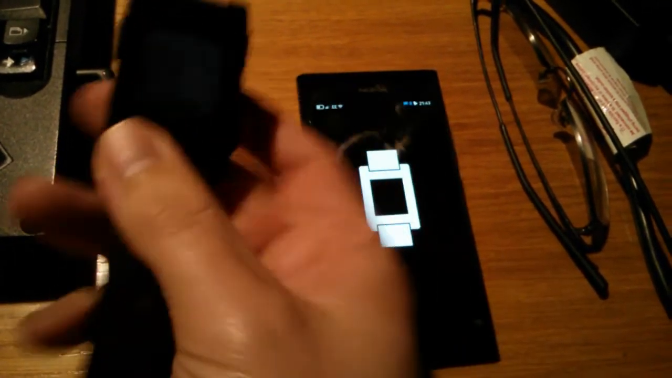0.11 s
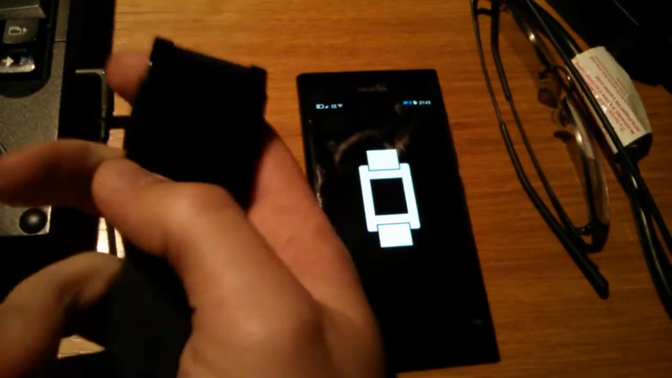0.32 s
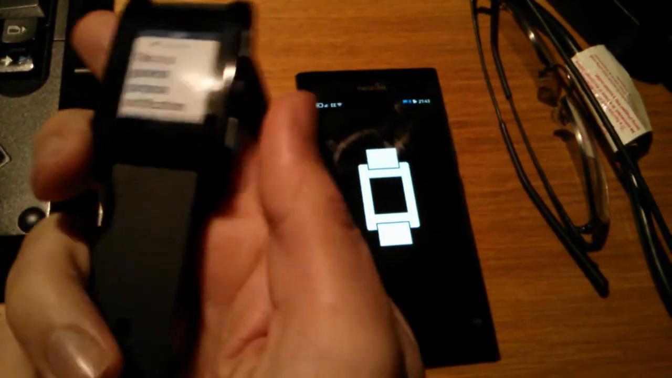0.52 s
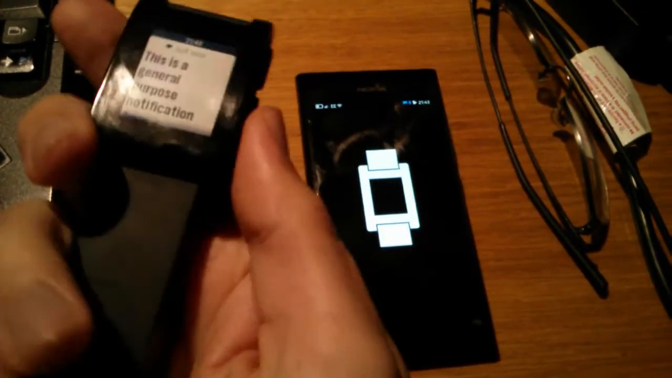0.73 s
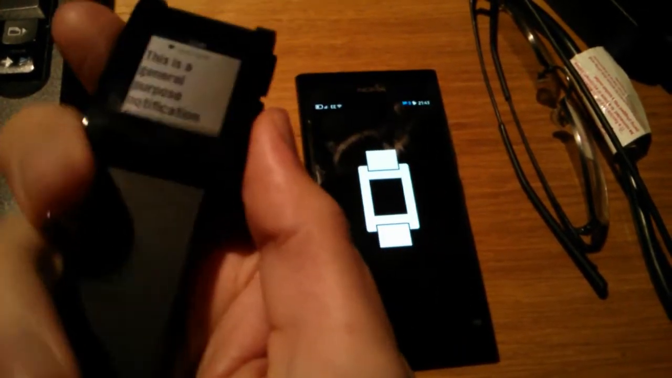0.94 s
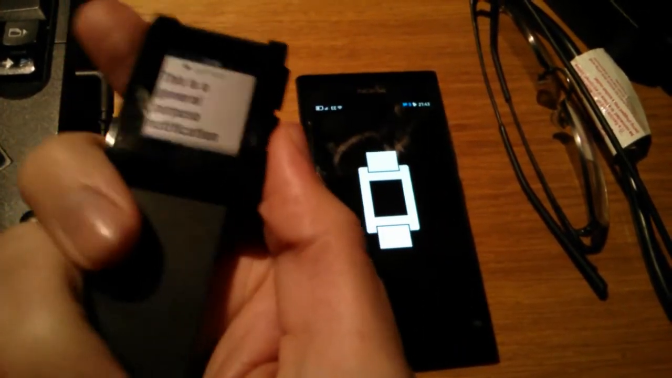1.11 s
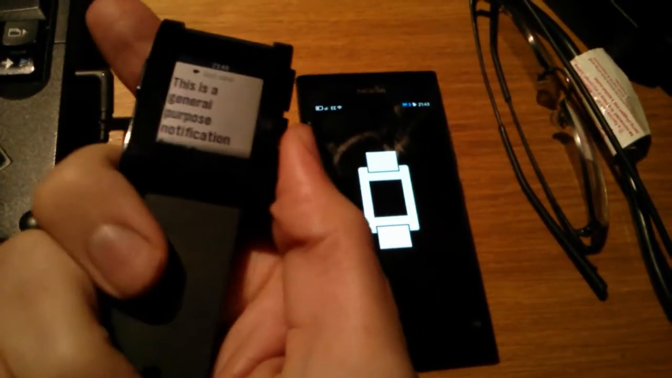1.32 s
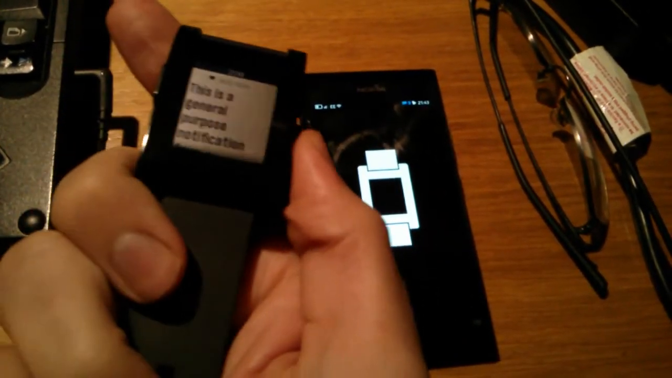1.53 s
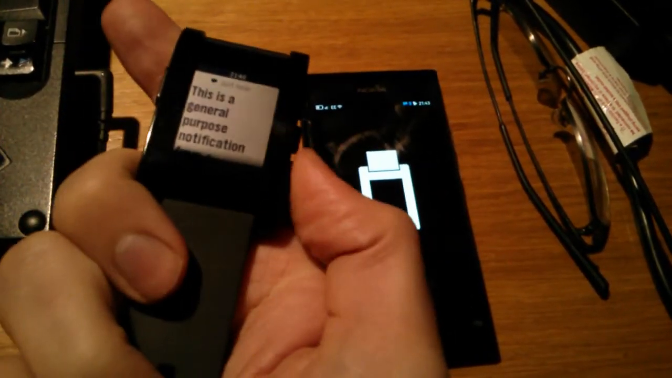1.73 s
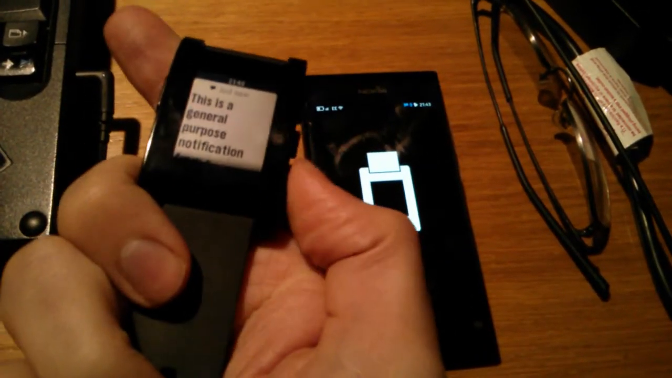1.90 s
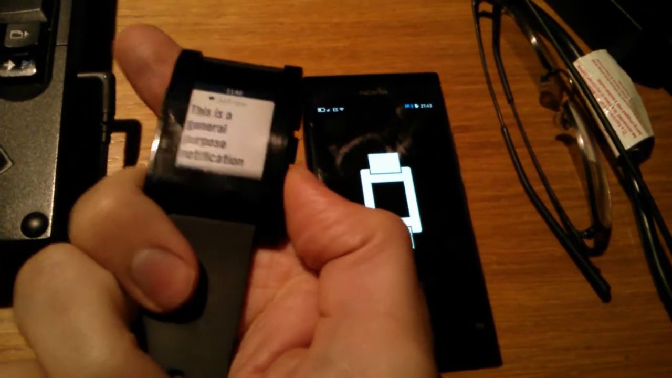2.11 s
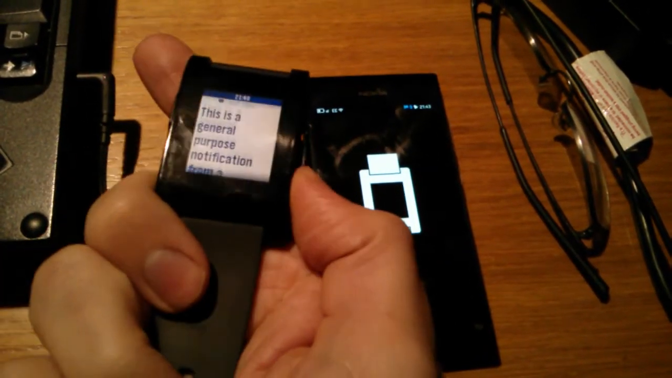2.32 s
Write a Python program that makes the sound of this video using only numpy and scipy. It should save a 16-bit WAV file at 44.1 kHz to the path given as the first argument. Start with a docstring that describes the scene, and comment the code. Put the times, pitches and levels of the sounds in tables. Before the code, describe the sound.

Close double click of a small watch button in a quiet room, with faint handling and hiss.

```python
"""The side button of a hand-held smartwatch, close to the microphone: a soft finger tap, then two sharp clicks,
one as it is pressed and one as it is let go. Each click is a filtered pulse with case modes and noise bursts,
answered by a small room. Skin scuffs are short noise bursts over dull ringing. A low bump of the grip (low sine)
comes before the tap; more bumps and faint ticks (noise) follow the clicks. Behind lie shaped-noise rumble and
microphone hiss, a wavering hum and a thin whine."""
import sys
import numpy as np
from scipy import signal
from scipy.fft import rfft, irfft
from scipy.io import wavfile

SR = 44100
rng = np.random.default_rng(int(sys.argv[2]) if len(sys.argv) > 2 else 0)


def inscribe(sig):
    """Save sig as 16-bit PCM at rate SR to the path in sys.argv[1].

    A 1-D sig is mono; a 2-D sig holds one channel per row.
    Samples are clipped to [-1, 1] before scaling.
    """
    pcm = np.round(np.clip(np.atleast_2d(sig).T, -1, 1) * 32767)
    wavfile.write(sys.argv[1], SR, pcm.astype(np.int16))


N = 105840  # 2.4 s

# Button snapping down, then up:
# (time [s], crack level [dB], ring level [dB], rattle and room level [dB], top of the crack [Hz])
BUTTON_CLICKS = [(0.2121, -0.5, 1, 0.5, 11370), (0.2652, -5, 0.5, -5, 10050)]
# Colour of the crack: (frequency [Hz], level [dB])
CRACK_COLOUR = [(100, -22.5), (250, -16), (380, -10.5), (560, -11.5), (950, -3.5), (1900, 1.5), (3100, -19),
                (4200, -20), (5000, 5.5), (6500, 4), (9000, 4), (11000, -6), (13000, -17), (16000, -19.5)]
# Resonances of the case, before the click's ring level:
# (frequency [Hz], peak level [dB], t60 [s], build-up [s])
CASE_MODES = [(378, -42, .05, .001), (452, -43.5, .045, .001), (670.6, -45.5, 0.058, 0.00073),
              (790, -46, 0.032, .001), (927, -40, 0.054, 0.00082), (1152, -45.5, .04, 0.0027),
              (1394, -36.5, 0.066, 0.0011), (1537, -43, 0.024, 0.00065), (1731, -36, 0.021, .001),
              (1903, -34, 0.033, .001), (2184, -41, 0.056, 0.0025), (2343, -42, .04, .004),
              (2620, -39.5, 0.013, .01), (2970, -32.5, 0.016, .014), (3306, -36.5, .02, 0.0053),
              (3655, -40.5, 0.023, .01), (4022, -41.5, 0.037, .006), (4500, -38.5, 0.054, .003),
              (4700, -36.5, .027, .002), (5238, -44, .035, .002), (5510, -43, 0.042, .002)]
# Dense ringing of small parts: (frequency [Hz], level [dB])
RATTLE_COLOUR = [(200, -23.5), (560, -21), (1100, -15.5), (1800, -5), (3200, -11), (4800, 4.5), (6500, 1.5),
                 (9000, -4), (10500, -14), (12500, -28), (16000, -30)]
# Thin top of each snap: (frequency [Hz], level [dB])
SPARK_COLOUR = [(8000, -45), (11700, -32), (12900, -18), (16000, -27.5)]
# Colour of the room's answer: (frequency [Hz], level [dB])
ROOM_COLOUR = [(150, -27), (400, -14.5), (560, -19), (900, -14.5), (1350, -6.5), (1900, -4.5),
               (2900, -10.5), (5000, -4.5), (8500, -12), (11000, -23.5), (16000, -30.5)]
# Decay of the room: (frequency [Hz], t60 [s])
ROOM_DECAY = [(250, 0.16), (1200, 0.15), (1950, .24), (2600, .16), (5000, .145), (12000, .17)]
# Fingertip meeting and pushing the button: (time [s], length [s], level [dB])
FINGER_TOUCHES = [(0.1177, 0.011, 2), (0.2024, 0.01, -5.5)]
# Colour of the skin scuff: (frequency [Hz], level [dB])
SCUFF_COLOUR = [(150, -34), (400, -30), (850, -17), (1100, -22.5), (1350, -21), (1850, -17), (2400, -26),
                (3000, -37), (4000, -36.5), (8000, -30.5), (15000, -38)]
# Colour of the tail after a touch: (frequency [Hz], level [dB])
TOUCH_TAIL_COLOUR = [(200, -33), (800, -22), (2000, -21.5), (3500, -39), (12000, -45)]
# Resonances under a soft touch, before the touch's level: (frequency [Hz], peak level [dB], t60 [s])
DULL_MODES = [(367, -62, .06), (570, -62, .05), (830, -51, 0.039), (1334.3, -59, .05), (1790, -52, .035),
              (1950, -55, .045), (2680, -64.5, .03), (3350, -62, .03), (5480, -67, 0.028)]
# Faint ticks and scuffs of the grip: (time [s], rise [s], t60 [s], level [dB])
GRIP_TICKS = [(0.664, 0.0085, 0.054, -9), (1.215, 0.026, .25, -9), (2.1944, 0.0006, 0.015, -11)]
# Colour of a tick: (frequency [Hz], level [dB])
TICK_COLOUR = [(500, -48), (4000, -56), (6700, -32), (8300, -34), (10500, -39), (15000, -51)]
# Soft low bumps of handling: (time [s], length [s], frequency [Hz], level [dB])
GRIP_BUMPS = [(0.031, 0.084, 96.2, -63.5), (0.909, 0.085, 57, -59), (1.205, 0.022, 83, -57.5),
              (1.233, 0.1, 78.4, -63.5), (1.955, 0.063, 43.8, -58.5)]
# Colour of the low rumble: (frequency [Hz], relative density [dB per Hz])
RUMBLE_COLOUR = [(12, -38), (20, -8), (65, 0), (113, -2), (145, -3.5), (171, -4), (204, -6), (242, -17.5),
                 (320, -24), (420, -49.5), (700, -120)]
# Rumble over time: (time [s], level [dB])
RUMBLE_COURSE = [(0, -69.5), (.07, -65.5), (.17, -67.5), (.5, -68.5), (.6, -73), (.78, -69.5), (.95, -68.5),
                 (1.1, -71), (1.23, -68), (1.4, -70), (1.55, -65), (1.68, -72), (1.9, -68), (2.05, -72.5),
                 (2.14, -63.5), (2.36, -65.5)]
# Hum over time: (time [s], level [dB])
HUM_COURSE = [(0, -68.5), (.3, -76), (.8, -73.5), (1.0, -77.5), (1.5, -68.5), (1.7, -78.5), (2.03, -73.5),
              (2.13, -66), (2.4, -65.5)]
# Colour of the microphone hiss: (frequency [Hz], relative density [dB per Hz])
HISS_COLOUR = [(180, -29.5), (300, -1), (370, -8), (401, -6.5), (775, -8.5), (940, -7), (1400, -14),
               (2310, -17), (2510, -23), (14000, -11)]
# Gain shared by hiss and whine: (time [s], level [dB])
HISS_COURSE = [(0, 9), (.1, 3.5), (.2, 8), (.33, 10.5), (.45, 5), (.6, 1), (1.6, 0.5), (1.85, 0), (2.1, 0),
               (2.4, 0)]
# Colour of the top of the hiss: (frequency [Hz], relative density [dB])
FIZZ_COLOUR = [(8000, -26), (12000, -7.5), (13500, -1), (14600, 0.5), (16000, -2)]
# Top of the hiss over time: (time [s], level [dB])
FIZZ_COURSE = [(0, -79.5), (.3, -78.5), (.6, -82), (1.0, -83), (1.6, -81.5), (1.85, -78.5), (2.1, -87),
               (2.4, -95)]

CRACK_FALL_S, CRACK_LOW_HZ = 0.00012, 5200  # the crack's lower treble arrives a little later
RATTLE_T60_S, RATTLE_RISE_S, SPARK_T60_S = 0.035, 0.0012, 0.014
ROOM_RISE_S, RING_ROOM_DB = 0.008, -24
TOUCH_T60_S, TOUCH_RISE_S = 0.09, 0.003
HUM_HZ, HUM_WAVER_HZ = 143, 3  # the waver is the rms deviation
HISS_BASE_DB = -75  # before the shared gain
WHINE_HZ, WHINE_BASE_DB = 15000, -81.5  # level before the shared gain
EDGE_HZ = 15850


def amp(db):
    """Decibels to gain."""
    return 10 ** (np.asarray(db) / 20)


def unit(x):
    """Scales to rms 1."""
    return x / np.sqrt(np.mean(x ** 2) + 1e-20)


def read(points, hz):
    """Reads a table on a log-frequency axis."""
    frequency, value = np.transpose(points)
    return np.interp(np.log(hz + 1), np.log(frequency + 1), value)


def level(points):
    """Gain over time from (time [s], level [dB]) points."""
    return amp(np.interp(np.arange(N) / SR, *np.transpose(points)))


def add(mix, s, sound):
    """Mixes a sound in at a time, cut at the end of the mix."""
    part = mix[round(s * SR):][:len(sound)]
    part += sound[:len(part)]


def dying(t, t60):
    """Exponential decay by 60 dB in t60."""
    return 1000. ** (-t / t60)


def rising(t, rise):
    """Smooth build-up from silence towards 1."""
    return 1 - np.exp(-(t / rise) ** 2)


def pulse(points, size=2048):
    """Minimum-phase pulse: the sharpest causal one with this spectrum."""
    hz = abs(np.fft.fftfreq(size, 1 / SR))
    log_gain = np.log(amp(read(points, hz)))
    spectrum = np.exp(np.conj(signal.hilbert(log_gain)))
    return np.fft.ifft(spectrum).real[:size // 2]


def burst(envelope, points):
    """Dense random impulses under an envelope, energy 1, then coloured."""
    taps = envelope * rng.choice([-1., 1.], len(envelope))
    taps = taps / np.linalg.norm(taps)
    return signal.fftconvolve(taps, pulse(points))[:len(taps)]


def noise(points):
    """Steady noise of rms 1 with this spectrum."""
    gain = amp(read(points, np.fft.rfftfreq(N, 1 / SR)))
    return unit(irfft(rfft(rng.standard_normal(N)) * gain, N))


def mode(t, hz, db, t60, rise):
    """One resonance that builds up to its peak and dies, at a random phase."""
    envelope = dying(t, t60) * rising(t, rise)
    return amp(db) * envelope / envelope.max() * np.sin(2 * np.pi * (hz * t + rng.random()))


def snap_crack():
    """A sharp pulse through an allpass, which delays the treble around one frequency."""
    radius = np.exp(-1 / (CRACK_FALL_S * SR))
    allpass = [1, -2 * radius * np.cos(2 * np.pi * CRACK_LOW_HZ / SR), radius ** 2]
    return signal.lfilter(allpass[::-1], allpass, pulse(CRACK_COLOUR))


def button():
    """The switch snaps: a crack, the modes of the case, a short rattle, a thin spark and the room."""
    out, t = np.zeros(N), np.arange(SR // 2) / SR
    ring = sum(mode(t, *row) for row in CASE_MODES)
    rattle = burst(dying(t, RATTLE_T60_S) * rising(t, RATTLE_RISE_S), RATTLE_COLOUR)
    crack = snap_crack()
    for s, crack_db, ring_db, rattle_db, top_hz in BUTTON_CLICKS:
        soften = signal.butter(4, top_hz, fs=SR)
        walls = room()
        answer = signal.fftconvolve(walls, pulse(ROOM_COLOUR))[:len(t)]
        ring_in_room = amp(RING_ROOM_DB) * signal.fftconvolve(walls, ring)[:len(t)]
        add(out, s, amp(crack_db) * signal.lfilter(*soften, crack))
        add(out, s, amp(rattle_db) * (rattle + answer))
        add(out, s, amp(ring_db) * (ring + ring_in_room))
        add(out, s, burst(dying(t, SPARK_T60_S), SPARK_COLOUR))
    return out


def room(size=256):
    """The small room's answer to an impulse: noise whose bands each die at their own speed."""
    hz, t, bands = signal.stft(rng.standard_normal(SR // 2), SR, nperseg=size)
    bands = bands * dying(t, read(ROOM_DECAY, hz)[:, None])
    tail = signal.istft(bands, SR, nperseg=size)[1][:SR // 2]
    tail = tail * rising(np.arange(len(tail)) / SR, ROOM_RISE_S)
    return tail / np.linalg.norm(tail)


def finger():
    """Skin scuffs the button for a few milliseconds; the watch rings dully and leaves a short tail."""
    out, t = np.zeros(N), np.arange(SR // 4) / SR
    for s, length, db in FINGER_TOUCHES:
        progress = np.minimum(t / length, 1)
        scuff = burst(np.sin(np.pi * progress), SCUFF_COLOUR)
        ring = sum(mode(t, *row, TOUCH_RISE_S) for row in DULL_MODES)
        tail = burst(progress ** 2 * dying(t, TOUCH_T60_S), TOUCH_TAIL_COLOUR)
        add(out, s, amp(db) * (scuff + ring + tail))
    return out


def grip():
    """The hands shift: ticks and scuffs are noise bursts, soft bumps are low sines under an arch."""
    out, t = np.zeros(N), np.arange(SR // 4) / SR
    for s, rise, t60, db in GRIP_TICKS:
        add(out, s, amp(db) * burst(dying(t, t60) * rising(t, rise), TICK_COLOUR))
    for s, length, hz, db in GRIP_BUMPS:
        arch = np.sin(np.pi * np.minimum(t / length, 1))
        add(out, s, amp(db) * arch * np.sin(2 * np.pi * hz * t))
    return out


def hum():
    """The room's low hum: a sine whose pitch wavers slowly at random."""
    slow = signal.butter(2, 8, fs=SR, output="sos")
    waver = unit(signal.sosfilt(slow, rng.standard_normal(N)))
    tone = np.sin(2 * np.pi * np.cumsum(HUM_HZ + HUM_WAVER_HZ * waver) / SR)
    return level(HUM_COURSE) * unit(tone)


def rumble():
    """Low noise of the room, swelling and sinking."""
    return level(RUMBLE_COURSE) * noise(RUMBLE_COLOUR)


def hiss_and_whine():
    """Microphone hiss and a thin electronic sine share one gain; the top of the hiss has its own."""
    whine = amp(WHINE_BASE_DB) * unit(np.sin(2 * np.pi * WHINE_HZ * np.arange(N) / SR))
    hiss = amp(HISS_BASE_DB) * noise(HISS_COLOUR)
    fizz = level(FIZZ_COURSE) * noise(FIZZ_COLOUR)
    return level(HISS_COURSE) * (hiss + whine) + fizz


def scene():
    """All sources at one close microphone."""
    background = hum() + rumble() + hiss_and_whine()
    return (button() + finger() + grip() + background)[None]


def record(dry):
    """The recorder's band limit: a steep lowpass."""
    lowpass = signal.firwin(511, EDGE_HZ, window=("kaiser", 9), fs=SR)
    return signal.oaconvolve(dry, lowpass[None], "same")


dry = scene()
out = record(dry)
inscribe(out)
```